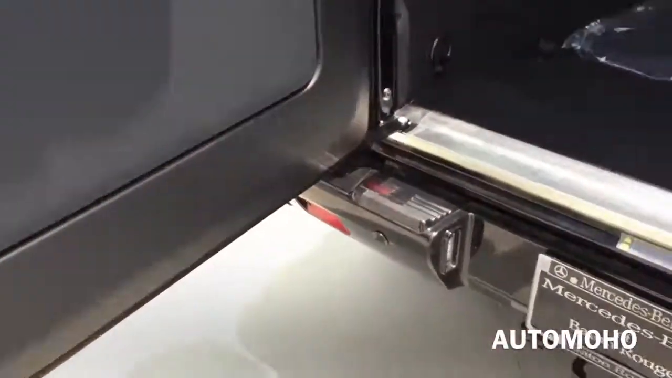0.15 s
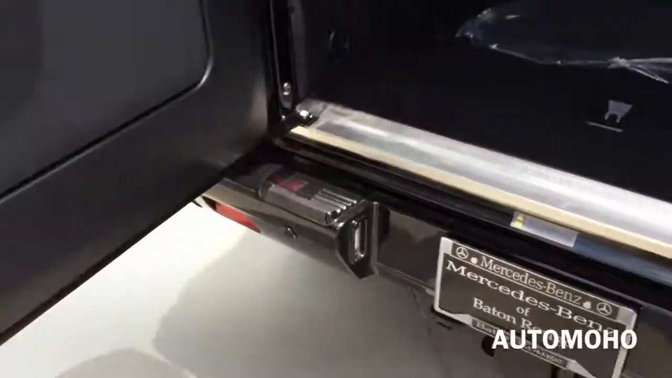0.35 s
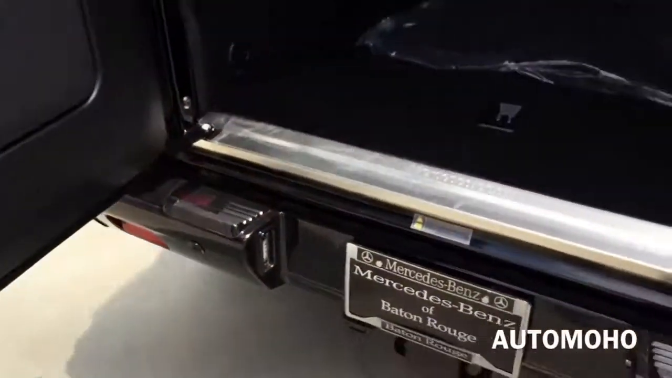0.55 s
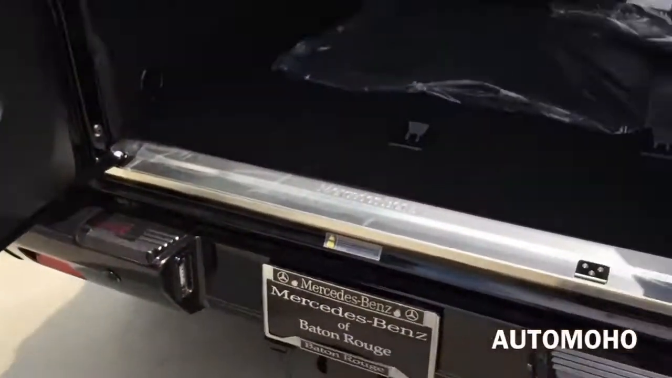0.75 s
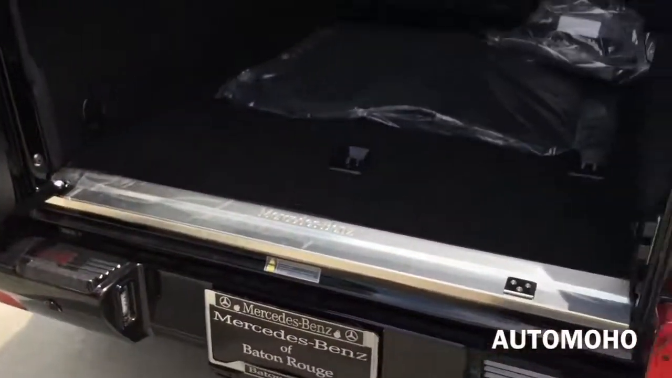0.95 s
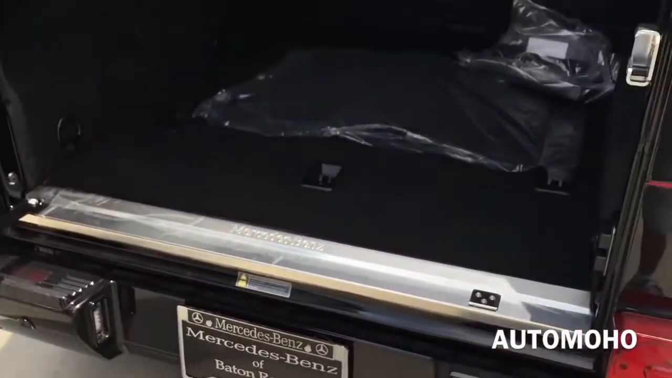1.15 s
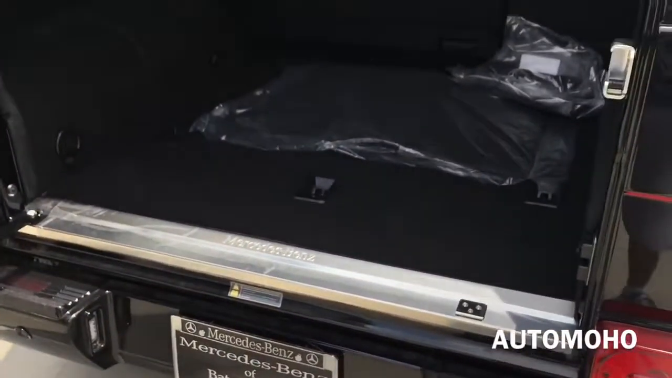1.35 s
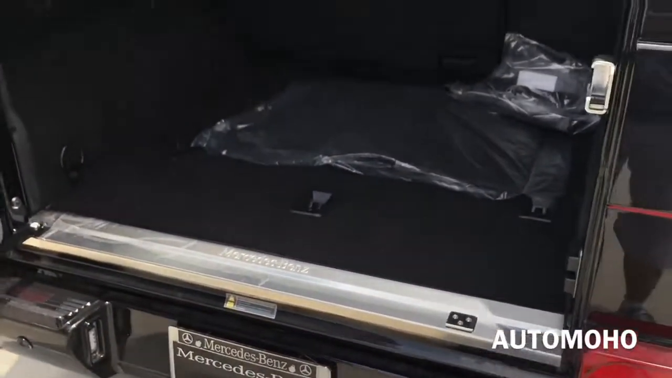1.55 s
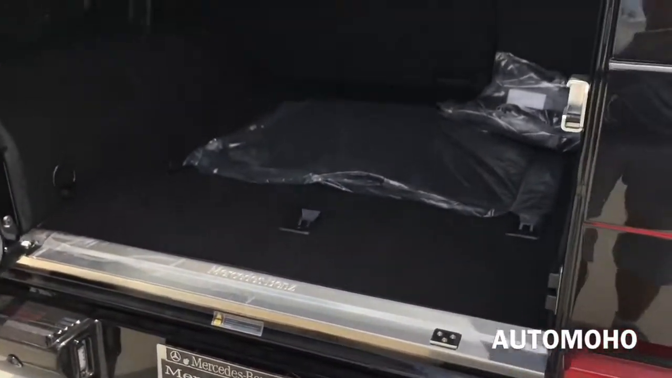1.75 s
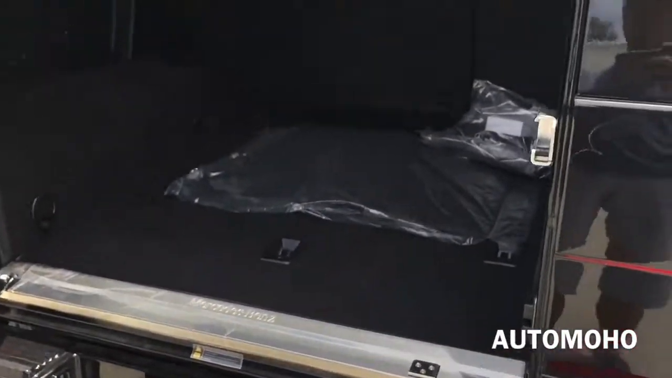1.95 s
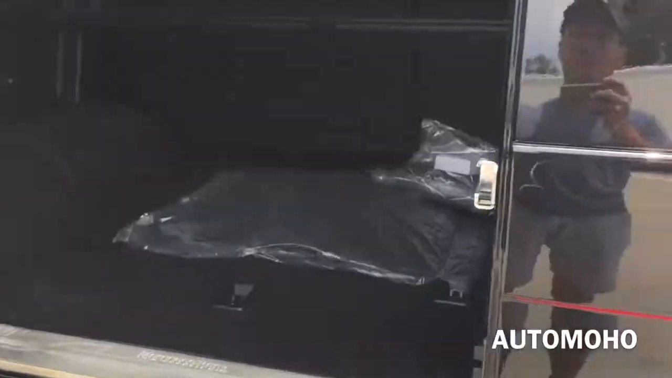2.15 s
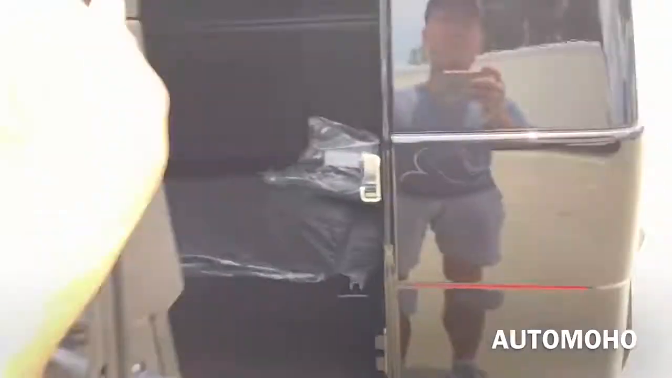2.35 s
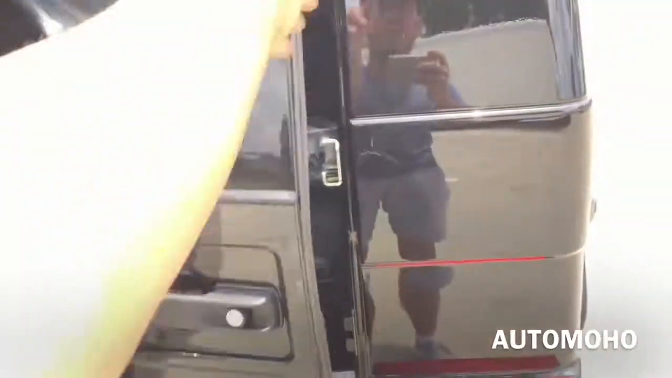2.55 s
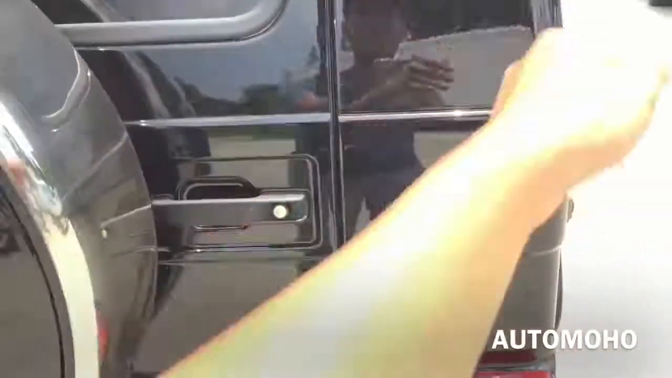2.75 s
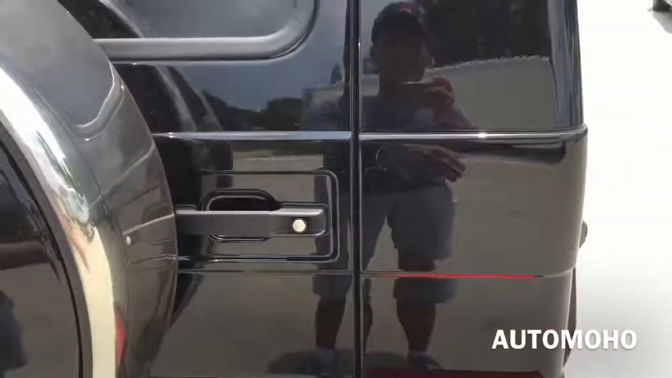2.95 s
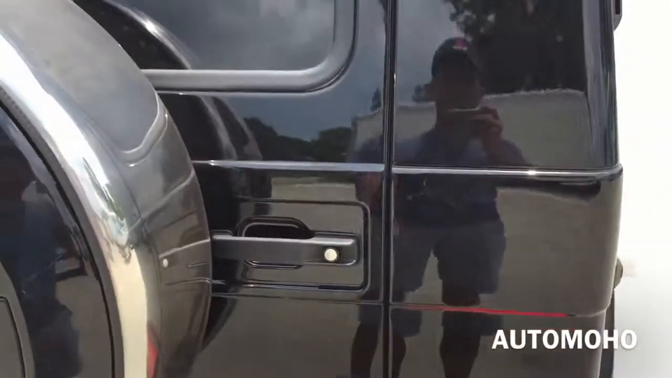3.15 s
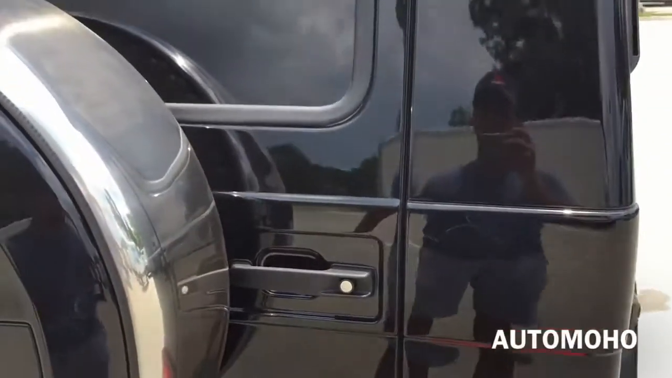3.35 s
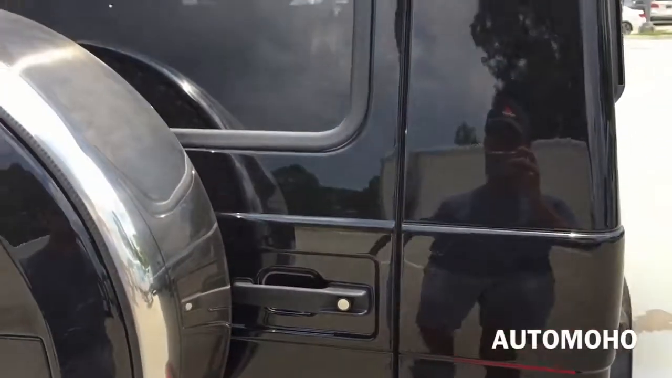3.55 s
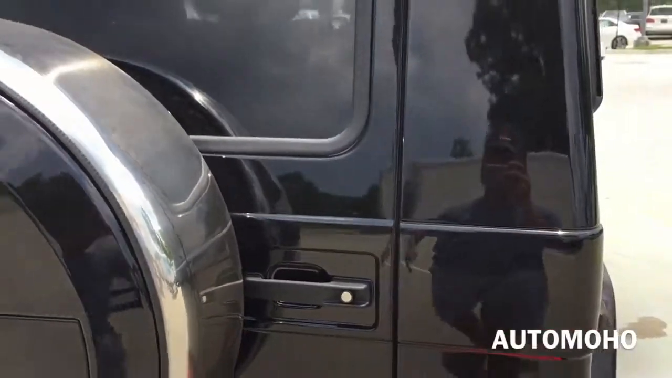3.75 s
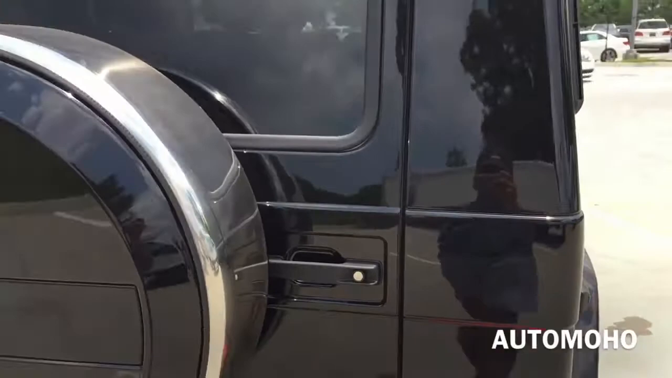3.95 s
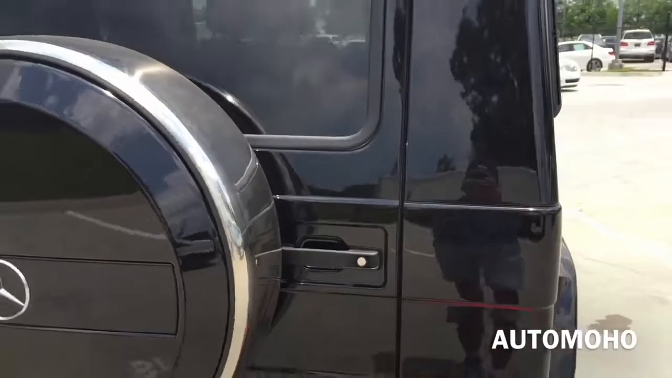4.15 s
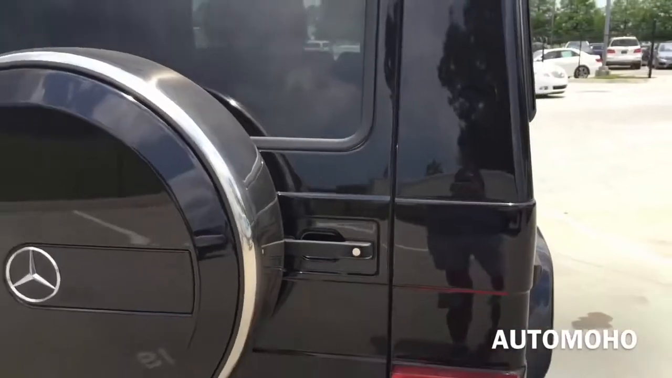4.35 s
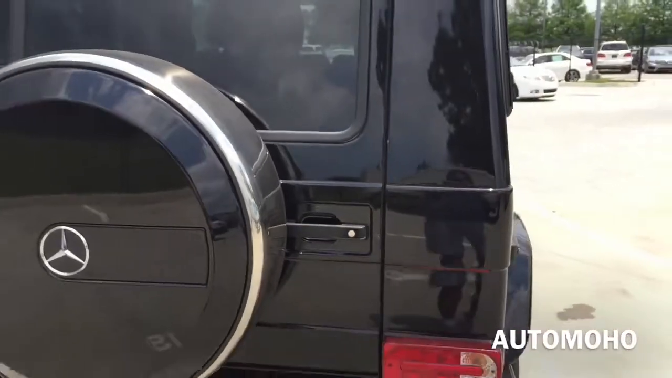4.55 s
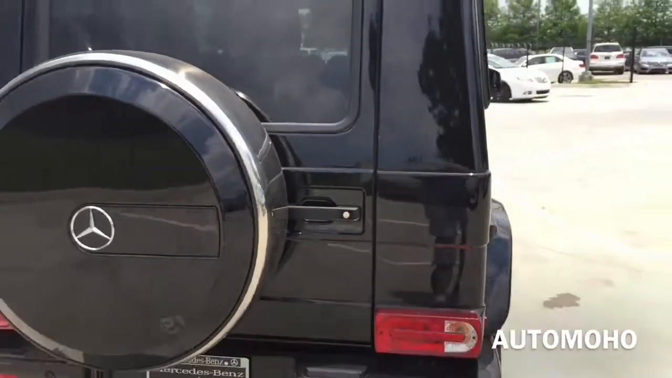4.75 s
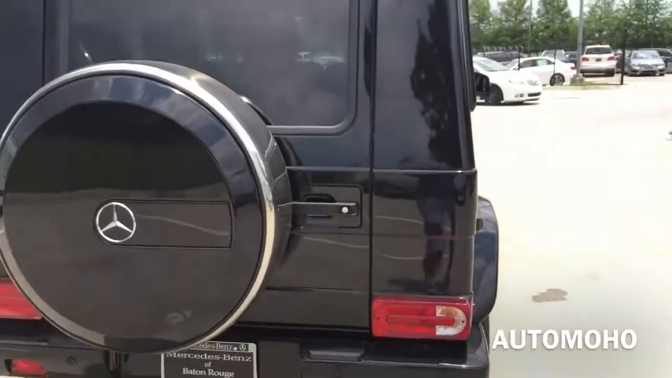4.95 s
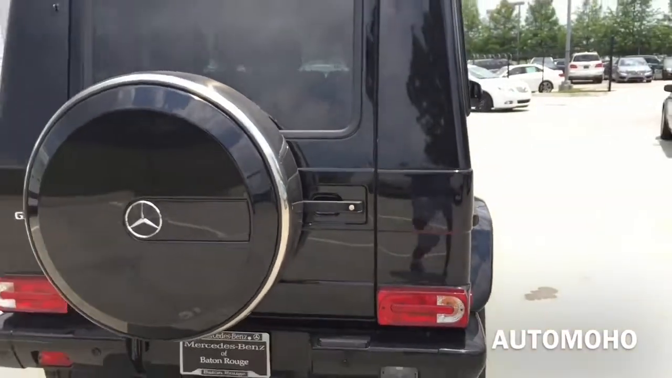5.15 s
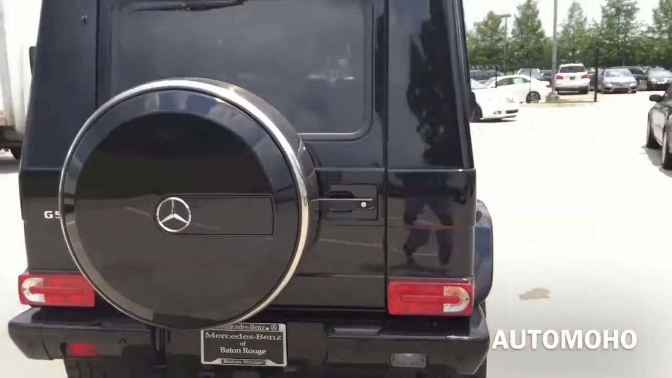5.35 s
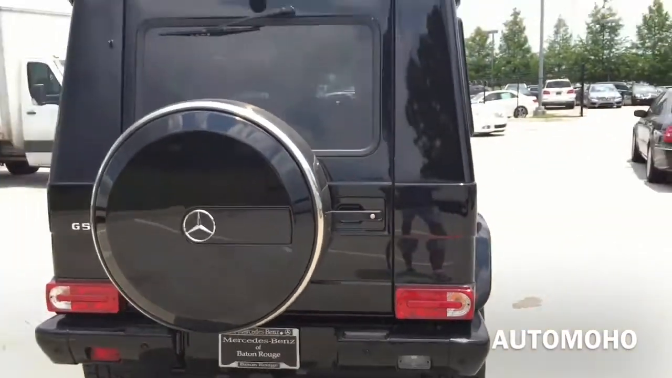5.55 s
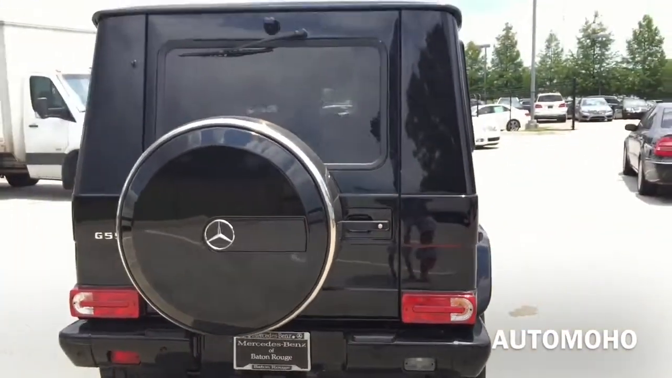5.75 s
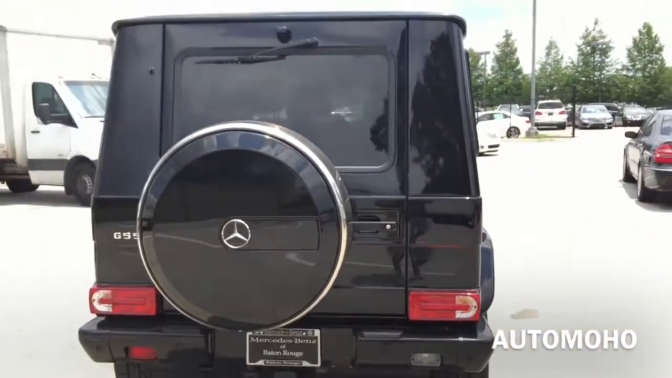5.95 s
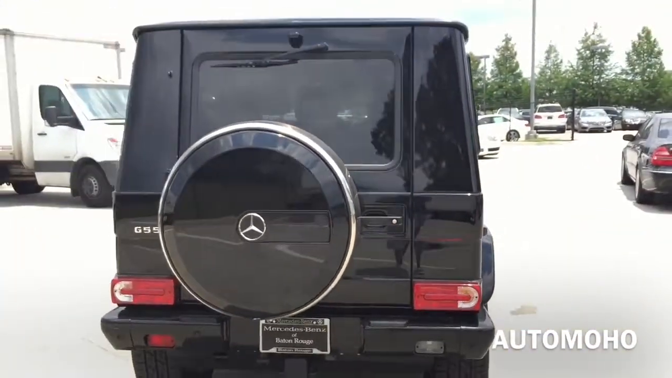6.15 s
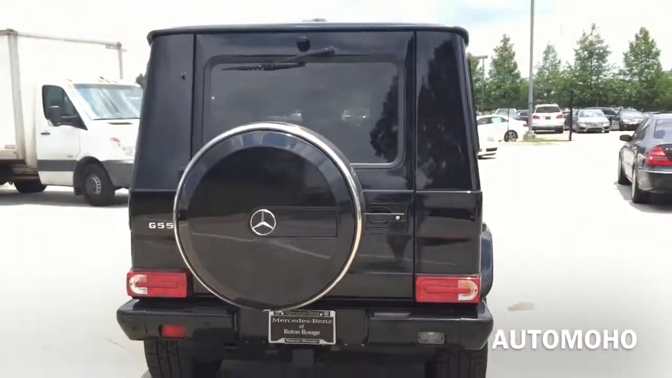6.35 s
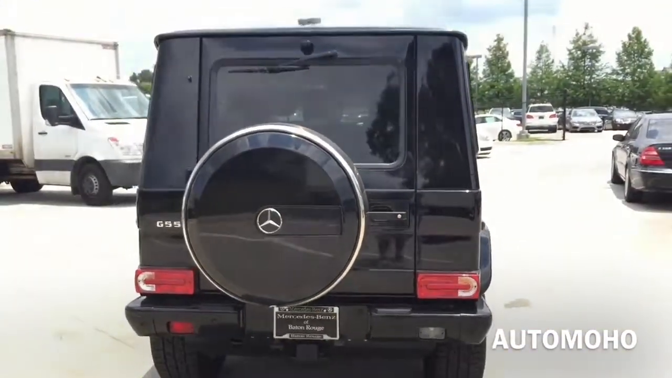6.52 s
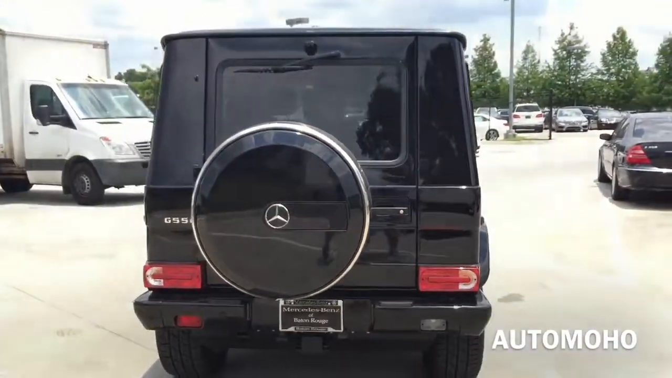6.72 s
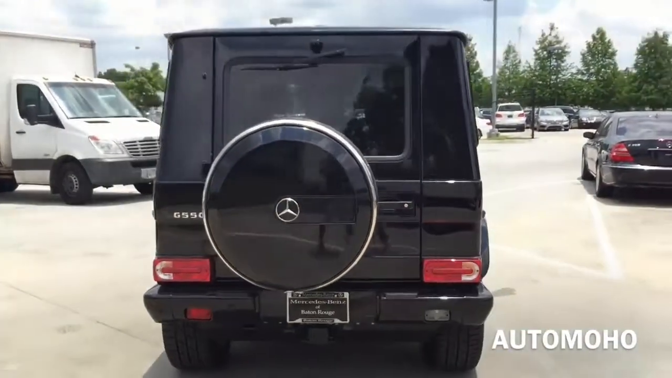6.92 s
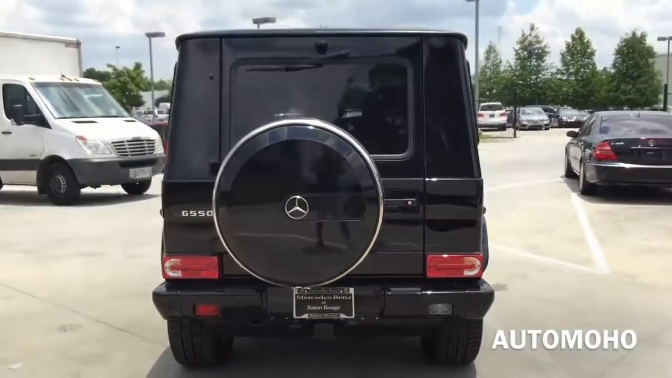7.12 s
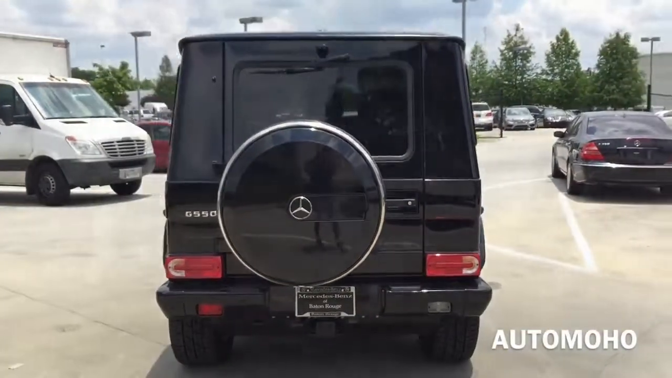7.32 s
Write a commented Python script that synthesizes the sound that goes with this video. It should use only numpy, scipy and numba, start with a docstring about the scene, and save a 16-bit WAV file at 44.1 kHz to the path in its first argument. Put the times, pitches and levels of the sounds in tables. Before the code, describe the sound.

A large engine idles close by throughout, a deep uneven exhaust throb of roughly twelve cycles a second, with ragged pipe rumble, a faint pump hum and soft hiss. Outdoors, handheld phone microphone. A small dull knock at 0.1 s and faint cloth swishes up to about 1 s. At 2.66 s a light metallic double click from the door stay. At 2.86 s the heavy door slams, by far the loudest event: a hard, bright steel latch crack and chatter lasting under a tenth of a second, joined by a deep boxy thump and a short open-air tail. Tiny settling clicks follow to 3.1 s; the level ducks, then recovers. From 4 s the microphone backs away: idle slightly weaker, hiss yielding to distant traffic wash. More cloth rustle from 4 to 5 s, a low bump at 5.0, a tick at 5.24. From 7.1 s a very faint thin hissy whine spins upward.

```python
"""Off-roader door slam, open car park

Close by, a V8 idles at the tailpipes: summed exhaust orders, throbbing pipe noise and a humming pump.
The heavy rear door slams: latch strikes and chatter ring steel bands, seal pushes drive body modes.
The phone's microphone rises, then backs away: hiss gives way to distant traffic (shaped noise).
Cloth swishes, small knocks sound, and a thin whine spins up at the end.
The phone's gain control ducks after the bang."""
import sys
import numpy as np
from scipy import signal
from scipy.fft import rfft, irfft
from scipy.io import wavfile
from scipy.ndimage import uniform_filter1d
from numba import njit

SR = 44100
rng = np.random.default_rng(int(sys.argv[2]) if len(sys.argv) > 2 else 0)


def persist_wave(psi):
    """Save psi, clipped to +-1, as 16-bit WAV."""
    counts = np.round(np.clip(psi, -1, 1) * 32767).astype(np.int16)
    wavfile.write(sys.argv[1], SR, np.atleast_2d(counts).T)


N = 325458
T = np.arange(N) / SR  # s

# catches of the lock: (t/s, strike level/dB, chatter level/dB, chatter t60/s, low cut f/Hz, high cut f/Hz)
LATCH_CATCHES = [(2.854, -6, -17, 0.06, 480, 1500), (2.8597, 26, -2.5, 0.028, 480, 2900),
                 (2.8675, 14, 2, 0.11, 554, 5200), (2.8763, 23.5, 1.5, 0.056, 700, 14400),
                 (2.8835, 18.5, 0, 0.058, 2400, 11000), (2.901, 7, -11, 0.067, 1800, 8500),
                 (2.914, 2, -28, 0.012, 3000, 14000), (2.92, 3, -18, 0.012, 2000, 14000),
                 (2.926, -6, -17, 0.035, 700, 8000), (2.943, -4, -22, 0.13, 600, 2400)]
# steel of the lock and the door edge around it: (f/Hz, width/Hz before the minimum, level/dB)
STEEL_RESONANCES = [(750, 150, -2.5), (916, 55, -9), (1052, 70, -5.5), (1210, 136, -4.5), (1500, 52, 0),
                    (1678, 45, -3), (1770, 32, -6), (1906, 290, -2), (2440, 260, -4.5), (2570, 35, -11),
                    (2680, 45, -10), (3250, 500, -9.5), (3646, 46, -6), (3940, 160, -11),
                    (4460, 230, -10.5), (5165, 54, -7), (5700, 1400, -10), (5908, 50, -11),
                    (8000, 3600, -17.5), (9990, 41, -6.5), (10500, 2000, -12.5), (14200, 3000, -13)]
MIN_WIDTH_HZ = 35
# the door pushing on its seal and frame: (t/s, contact time/s, level/dB)
SEAL_BLOWS = [(2.8632, .0012, -18), (2.8778, .0018, -6), (2.8819, .0031, -1), (2.8945, .0012, -7),
              (2.9042, .0035, 3), (2.9121, .0034, 3.5), (2.9211, .0028, 2), (2.9415, .0022, -10),
              (2.9671, .0045, -3)]
# modes of door skin and cabin: (f/Hz, level/dB, t60/s)
BODY_MODES = [(58.4, -24, 0.95), (84, -25, 0.34), (103.7, -19, 0.49), (122.3, -14, 0.39),
              (144.5, -37, 0.49), (157.3, -1, 0.36), (176.8, -21, 0.36), (188, -18, 0.27),
              (243, -8.5, 0.059), (270.4, -15, 0.37), (320, -4.5, 0.08), (346, -27, 0.97),
              (363, -18.5, 0.19), (388, -7, 0.088), (435, -11.5, 0.095), (465, -13, 0.097),
              (542, -14, 0.12)]
# the door stay clicking as the swing begins: (t/s, level/dB)
STAY_CLICK_EVENTS = [(2.6618, -14.5), (2.6651, -23)]
# ring of the door stay: (f/Hz, width/Hz, level/dB)
STAY_RING = [(576, 230, -17.5), (925, 520, -11.5), (1580, 520, -4.5), (2460, 450, -16), (4400, 2900, -24)]
# the shut door settling in its lock: (t/s, level/dB)
SETTLE_CLICK_EVENTS = [(2.9728, -23), (3.0565, -29.5), (3.124, -40)]
# ring of the settling lock: (f/Hz, width/Hz, level/dB)
SETTLE_RING = [(480, 200, -9), (1090, 380, 1), (1400, 300, -11), (2850, 400, -19), (5000, 3000, -16)]
# the slam scattered by ground and parked cars: (f/Hz, level/dB, t60/s)
SCATTER_BANDS = [(190, -14, 0.33), (420, -15, 0.3), (750, -6, 0.25), (1310, -6, 0.24), (2600, -14.5, 0.23),
                 (5240, -15.5, 0.22), (10400, -11.5, 0.12)]

# exhaust note: (multiple of the cycle rate, relative level/dB at the bumper, same a few steps back)
EXHAUST_ORDERS = [(3, -20.5, -24.0), (4, -7.0, -3.0), (5, 0.0, 0.0), (6, -22.5, -20.5), (7, -6.0, -1.5),
                  (8, -11.5, -11.0), (9, -5.0, -3.5), (10, -21.0, -21.5), (11, -17.0, -13.0),
                  (12, -4.0, -3.5), (13, -16.0, -13.5), (14, -23.0, -26.5), (15, -23.5, -23.5),
                  (16, -24.0, -19.5), (17, -38.5, -34.0), (18, -35.5, -25.5), (19, -37.5, -28.5),
                  (20, -34.0, -31.5), (21, -37.5, -34.5), (22, -40.0, -30.0), (23, -26.0, -26.5),
                  (24, -21.5, -19.5), (25, -25.0, -23.5), (26, -31.0, -29.5), (27, -34.0, -35.0),
                  (30, -37.5, -38.5), (32, -39.0, -37.5)]
# cylinders in firing order: (bank, strength/dB)
FIRING_ORDER = [(0, .9), (1, .7), (0, -.9), (0, .1), (1, -.7), (0, -.8), (1, .6), (1, .1)]
# the idle sags a little: (t/s, engine cycle rate f/Hz)
IDLE_RATE = [(0, 11.7085), (1.6, 11.7085), (2.3, 11.6635), (4.7, 11.6525), (6, 11.6705)]
# ragged gas flow in the tailpipe: (f/Hz, width/Hz, level/dB before RUSH_DB)
PIPE_RESONANCES = [(59, 53, -34.5), (126.7, 65, -40), (282.1, 33.5, -49), (350.8, 22, -57),
                   (373, 148, -56.5)]
# pump hum: (t/s, level/dB)
PUMP_LEVEL = [(0, -39), (3.9, -41), (5.7, -35.5), (6.4, -39), (7.3, -37)]
# overtone of the pump hum: (t/s, level/dB)
PUMP_OVERTONE_LEVEL = [(0, -51), (2.7, -48), (3.1, -50.5), (4.4, -49), (5.1, -56), (7.3, -58)]

# small knocks of hinge, trim and shoes: (t/s, level/dB, f/Hz, t60/s)
SMALL_KNOCKS = [(0.084, -32.5, 680, 0.035), (2.533, -45, 950, 0.1), (2.686, -47, 1400, 0.25),
                (4.112, -49, 1300, 0.12), (5.01, -30, 80.6, 0.1), (5.013, -40, 950, 0.013),
                (5.2422, -40.5, 2150, 0.02)]
# swishes of clothing: (t/s, length/s, level/dB)
CLOTH_SWISHES = [(0.092, 0.29, -60), (0.418, 0.31, -56), (0.6, 0.17, -54.5), (1.048, 0.4, -61),
                 (3.985, 1, -62), (4.543, 0.26, -56.5), (4.86, 0.21, -53), (5.363, 0.042, -61),
                 (5.93, 0.076, -61)]
# spectrum of rubbing fabric, also of the whine's hiss: (f/Hz, relative level/dB)
CLOTH_SPECTRUM = [(1500, 4.5), (2600, 1), (4000, -3), (6000, 0), (8500, -1.5), (11000, -5), (15500, -9.5)]
# spectrum of exhaust hiss near the bumper: (f/Hz, relative level/dB)
HISS_SPECTRUM = [(260, -16.5), (450, -2), (671, -4.5), (712, -9), (767, -10), (826, -13), (1210, -10.5),
                 (1330, -15), (2040, -13.5), (3370, -18), (4960, -25), (11700, -26), (15500, -35)]
# spectrum of distant traffic and engine fan: (f/Hz, relative level/dB)
TRAFFIC_SPECTRUM = [(260, -46), (450, -20), (470, -7.5), (587, -1.5), (671, -3), (986, 0.5), (1110, -4.5),
                    (1350, -5), (1470, -9.5), (1610, -7), (2190, -11.5), (3270, -9), (4810, -22.5),
                    (9790, -27), (15500, -33)]
# partials of the whine: (multiple of its base frequency, relative level/dB)
WHINE_MULTIPLES = [(2, -1), (3, 0), (3.55, -7), (4.2, -8), (5.4, -8), (6, -1), (6.3, -9)]

# start of a cycle (s), lag of the second bank's longer pipe (cycles), lag in the silencer (cycles per order)
CYCLE_START_S, BANK_LAG, SILENCER_LAG = .0735, .0059, .0113
# the phone's two moves, (start s, end s): up from the bumper, then backwards across the car park
LIFT_S, RETREAT_S = (1.84, 4.84), (3.9, 6.7)
# levels before and after the lift: exhaust hiss, traffic and engine fan
HISS_DB, TRAFFIC_DB = (-49, -59.5), (-58, -49.5)
# before and after the retreat: level of the exhaust note, gain on the pipe rush
EXHAUST_DB, RUSH_DB = (-24, -27.5), (0.9, -2)
# the rush dips once, briefly
DIP_S, DIP_LENGTH_S, DIP_DB = 5.1, 0.14, -16
# the whine fades in while its base frequency climbs towards the top
WHINE_START_S, WHINE_FADE_S, WHINE_DB = 7.1, .16, -63
WHINE_START_HZ, WHINE_TOP_HZ, SPIN_UP_S = 1400, 2700, .21
TOP_HZ = 15750  # upper limit of the phone's sound


def latch(grain_db=4.0):
    """Each catch strikes once, then chatters and rings the steel; heavy parts are duller, small ones thinner."""
    force, t = np.zeros(N), T[:SR // 4]
    for s, strike_db, chatter_db, t60, low_hz, high_hz in LATCH_CATCHES:
        grains = undb(grain_db * walk(1500)[:len(t)])
        chatter = unit(rng.standard_normal(len(t)) * grains)
        strike = undb(strike_db) * (t == 0)
        contact = strike + undb(chatter_db) * chatter * fade(t, t60)
        part = signal.butter(2, [low_hz, min(high_hz, TOP_HZ)], "band", fs=SR, output="sos")
        add(force, s, signal.sosfilt(part, contact))
    return sum(undb(db) * band(force, hz, max(width, MIN_WIDTH_HZ)) for hz, width, db in STEEL_RESONANCES)


def boom():
    """The door lands in several pushes; the longer the contact, the deeper the panels answer."""
    force, t = np.zeros(N), T[:SR]
    for s, contact_s, db in SEAL_BLOWS:
        push = np.hanning(int(contact_s * SR) + 2)
        add(force, s, undb(db) * push / push.sum())
    panels = sum(undb(db) * np.sin(2 * np.pi * hz * t) * fade(t, t60) for hz, db, t60 in BODY_MODES)
    answer = signal.fftconvolve(force, panels)[:N]
    # very slow panel motion only shoves air around the car and does not radiate
    return signal.sosfilt(signal.butter(2, 40, "high", fs=SR, output="sos"), answer)


def clicks(events, ring):
    """A steel part drops into place: single impulses excite its resonances."""
    force = np.zeros(N)
    for s, db in events:
        add(force, s, undb([db]))
    # the bandwidth factor evens out the peak of wide and narrow bands
    return sum(undb(db) * band(force, hz, width, order=3) * SR / (2 * width) for hz, width, db in ring)


def scatter(x, build_s=0.0071):
    """Ground and parked cars return a short open-air tail whose treble dies first."""
    t = T[:SR // 2]
    tail = 0
    for hz, db, t60 in SCATTER_BANDS:
        hiss = band(rng.standard_normal(len(t)), hz, 1.04 * hz, order=2)
        decay = fade(t, t60) / np.sqrt(t60 * SR / np.log(10 ** 6))  # unit energy
        tail = tail + undb(db) * hiss * decay
    build_up = 1 - np.exp(-t / build_s)
    return signal.fftconvolve(x, tail * build_up)[:N]


def exhaust_note(turns, uneven_db=-0.5):
    """Uneven firings line the cycle's harmonics up into one heavy beat; the silencer delays higher orders."""
    # the two tailpipes add up differently as the phone backs away from the bumper
    away = ramp(*RETREAT_S)
    bank, strength_db = np.transpose(FIRING_ORDER)
    firings = np.arange(len(bank)) / len(bank) + BANK_LAG * bank
    note = 0
    for k, close_db, far_db in EXHAUST_ORDERS:
        beat = np.sum(undb(strength_db) * np.exp(-2j * np.pi * k * firings))
        phase = 2 * np.pi * k * (turns - SILENCER_LAG * k) + np.angle(beat)
        note = note + undb(close_db + away * (far_db - close_db)) * np.cos(phase)
    return unit(note) * undb(moved(EXHAUST_DB, RETREAT_S) + uneven_db * walk(24))


def pipe_rush(turns, throb=0.29):
    """Ragged gas excites the tailpipe resonances and throbs four times a cycle."""
    rush = sum(undb(db) * unit(band(rng.standard_normal(N), hz, width, order=2))
               for hz, width, db in PIPE_RESONANCES)
    throbbing = rush * (1 + throb * np.cos(2 * np.pi * 4 * turns))
    return throbbing * undb(moved(RUSH_DB, RETREAT_S) + DIP_DB * swell(DIP_S, DIP_LENGTH_S))


def pump(turns, ratio=16.6):
    """A belt-driven pump hums at a fixed multiple of the cycle rate, with phase and level wander."""
    shaft = 2 * np.pi * (ratio * turns + 0.091 * walk(10))
    hum_db = np.interp(T, *np.transpose(PUMP_LEVEL)) + 0.98 * walk(3.02)
    overtone_db = np.interp(T, *np.transpose(PUMP_OVERTONE_LEVEL)) + 2 * walk(6.4)
    return unit(np.sin(shaft)) * undb(hum_db) + unit(np.sin(2 * shaft)) * undb(overtone_db)


def engine():
    """The lumpy V8 repeats its firing pattern every cycle; note, pipe rush and pump share its turns."""
    turns = np.cumsum(np.interp(T, *np.transpose(IDLE_RATE))) / SR - IDLE_RATE[0][1] * CYCLE_START_S
    return exhaust_note(turns) + pipe_rush(turns) + pump(turns)


def knocks(spread=0.37, tick_db=-31):
    """Short dry knocks: decaying noise in a band around each pitch, with a faint tick on top."""
    out, t = np.zeros(N), T[:SR // 4]
    for s, db, hz, t60 in SMALL_KNOCKS:
        contact = rng.standard_normal(len(t)) * fade(t, t60)
        ring = band(contact, hz, spread * hz, order=2) * np.sqrt(SR / (2 * spread * hz))
        tick = undb(tick_db) * band(contact, 3500, 5000)
        add(out, s, undb(db) * (ring + tick))
    return out


def clothes(grain_db=1.8):
    """Fabric slides over fabric near the microphone: grainy noise in soft swells."""
    rubbing = sum(undb(db) * swell(s, length) for s, length, db in CLOTH_SWISHES)
    return rubbing * noise(CLOTH_SPECTRUM) * undb(grain_db * walk(90))


def whine(hiss_db=3):
    """A thin, hissy whine spins up at the end: jittered partials over shaped noise."""
    spin_up = np.exp(-np.maximum(T - WHINE_START_S, 0) / SPIN_UP_S)
    hz = WHINE_TOP_HZ + (WHINE_START_HZ - WHINE_TOP_HZ) * spin_up
    lines = 0
    for k, db in WHINE_MULTIPLES:
        turns = np.cumsum(hz * (1 + .007 * walk(400))) / SR
        lines = lines + undb(db) * np.sin(2 * np.pi * k * turns)
    fade_in = ramp(WHINE_START_S, WHINE_START_S + WHINE_FADE_S)
    return undb(WHINE_DB) * fade_in * (unit(lines) + undb(hiss_db) * noise(CLOTH_SPECTRUM))


def air():
    """Exhaust hiss near the bumper gives way to the wash of distant traffic and the engine fan."""
    hiss = noise(HISS_SPECTRUM) * undb(moved(HISS_DB, LIFT_S) + .6 * walk(40.1))
    traffic = noise(TRAFFIC_SPECTRUM) * undb(moved(TRAFFIC_DB, LIFT_S) + 0.63 * walk(8.9))
    return hiss + traffic


def mirrored(x, echo=0.13):
    """Bodywork and concrete send sound back a few milliseconds late, the lag growing steadily."""
    lags_s = (0.00231 + 0.000404 * T, .0071 + .0001 * T)
    return x + echo * sum(np.interp(T - lag, T, x) for lag in lags_s)


def undb(db):
    """Decibels to gain."""
    return 10 ** (np.asarray(db) / 20)


def unit(x):
    """Scale to an rms of one."""
    return x / np.sqrt(np.mean(x ** 2))


def band(x, hz, width, order=1):
    """Resonance with gain one at its centre."""
    low = np.hypot(hz, width / 2) - width / 2  # edges whose geometric mean is hz
    high = min(low + width, SR / 2 - 100)
    return signal.sosfilt(signal.butter(order, [low, high], "band", fs=SR, output="sos"), x)


def noise(points):
    """Noise of unit rms with a spectrum through (f/Hz, level/dB) points."""
    hz, db = np.transpose(points)
    f = np.maximum(np.arange(N // 2 + 1) * SR / N, 1)
    shape = undb(np.interp(np.log(f), np.log(hz), db, left=-120))
    return unit(irfft(rfft(rng.standard_normal(N)) * shape, N))


def walk(rate):
    """Smooth random wander of unit rms, drawing a new value `rate` times a second."""
    k = int(SR / rate)
    steps = np.repeat(rng.standard_normal(N // k + 1), k)
    return unit(uniform_filter1d(uniform_filter1d(steps, k), k)[:N])


def fade(t, t60):
    """Free decay, 60 dB in t60 seconds."""
    return np.exp(-np.log(1000) * t / t60)


def swell(s, length):
    """A soft bell-shaped rise and fall around a moment."""
    return np.exp(-(2 * (T - s) / length) ** 2)


def ramp(start_s, end_s):
    """Progress of a steady move, from zero to one."""
    return np.clip((T - start_s) / max(end_s - start_s, .01), 0, 1)


def moved(levels_db, move_s):
    """A level in dB that slides from its first value to its second during a move."""
    before, after = levels_db
    return before + (after - before) * ramp(*move_s)


def add(out, s, x):
    """Mix a sound in at a given time in seconds."""
    i = int(s * SR)
    out[i:i + len(x)] += x[:N - i]


def scene(latch_db=0, boom_db=0):
    """Door, engine and car park at one microphone."""
    slam = undb(latch_db) * latch() + undb(boom_db) * boom()
    stay = clicks(STAY_CLICK_EVENTS, STAY_RING)
    settling = clicks(SETTLE_CLICK_EVENTS, SETTLE_RING)
    door = stay + slam + scatter(slam) + settling
    return (door + engine() + knocks() + clothes() + whine() + mirrored(air()))[None]


@njit
def follow(x, attack, release):
    """Level follower, quick to rise and slow to fall."""
    out, e = np.empty(len(x)), 0.
    for i in range(len(x)):
        e += (x[i] - e) * (attack if x[i] > e else release)
        out[i] = e
    return out


def record(dry, release_s=0.52):
    """The phone's gain control ducks after the bang, the peaks are rounded and the top is cut."""
    ceiling, attack_s, knee = .55, .012, 6
    level = follow(np.abs(dry[0]), 1 / (attack_s * SR), 1 / (release_s * SR))
    held = dry * np.minimum(1, ceiling / (level + 1e-9))
    rounded = held / (1 + np.abs(held) ** knee) ** (1 / knee)
    return signal.sosfilt(signal.ellip(8, .2, 70, TOP_HZ, fs=SR, output="sos"), rounded)


dry = scene()
out = record(dry)
persist_wave(out)
```